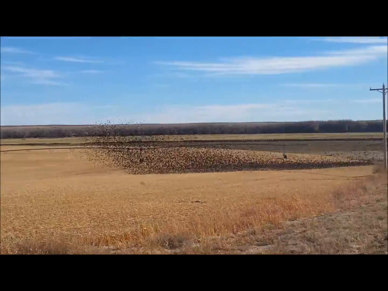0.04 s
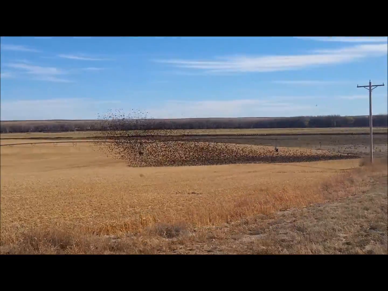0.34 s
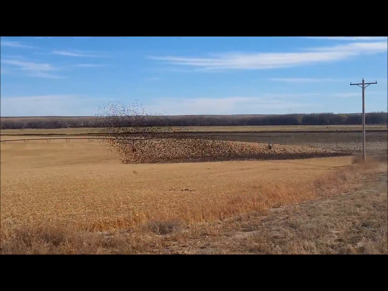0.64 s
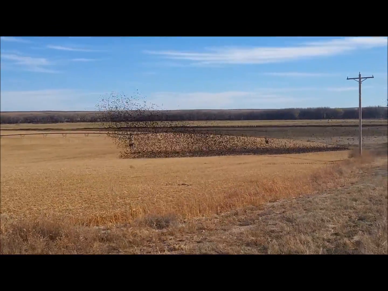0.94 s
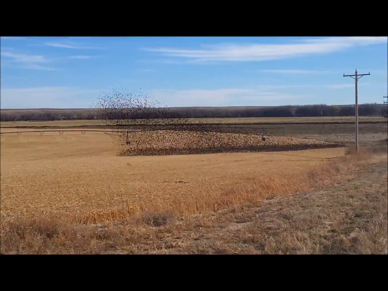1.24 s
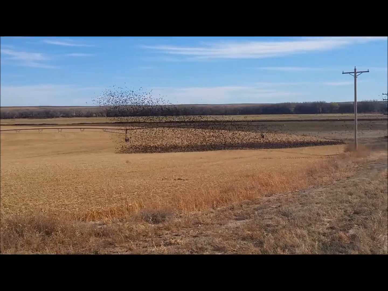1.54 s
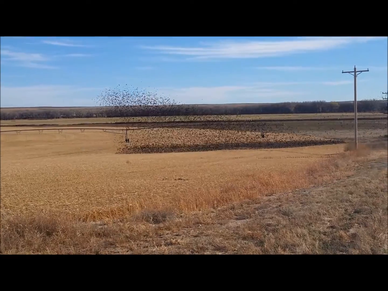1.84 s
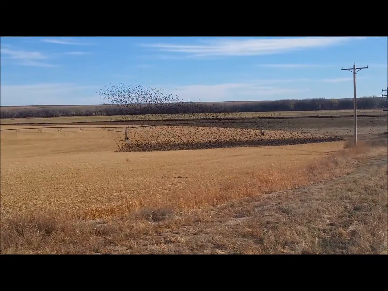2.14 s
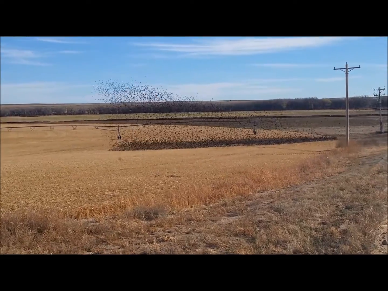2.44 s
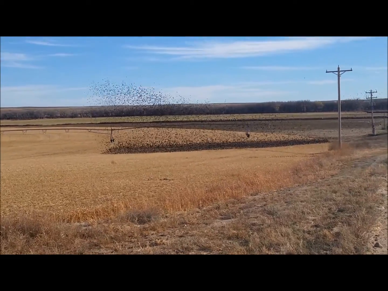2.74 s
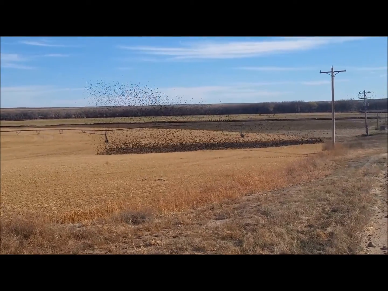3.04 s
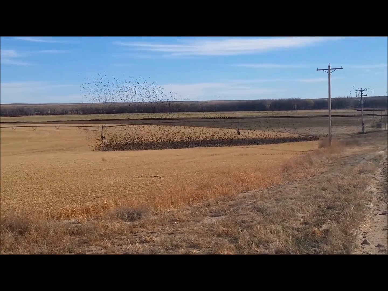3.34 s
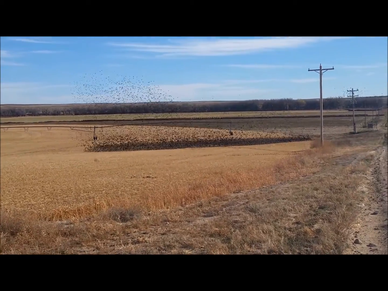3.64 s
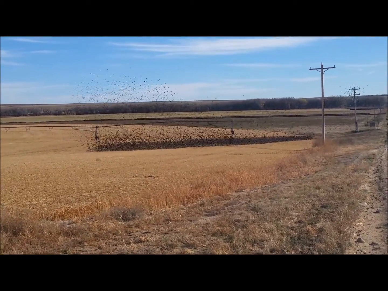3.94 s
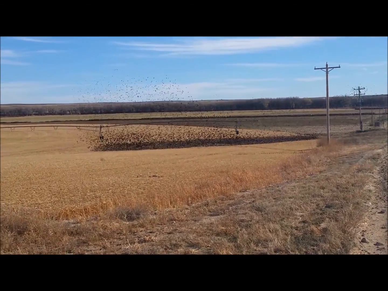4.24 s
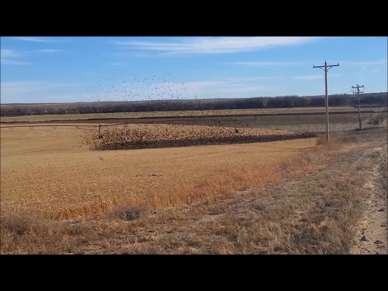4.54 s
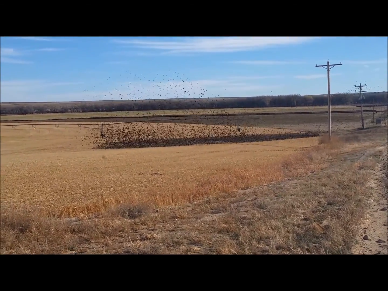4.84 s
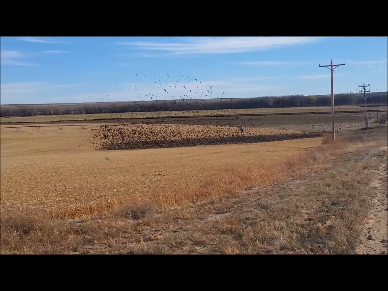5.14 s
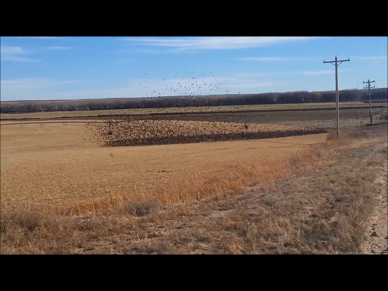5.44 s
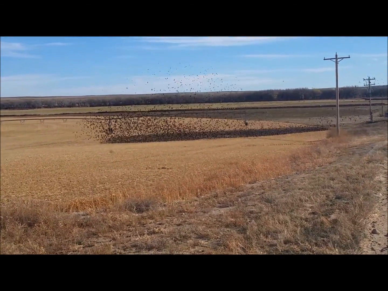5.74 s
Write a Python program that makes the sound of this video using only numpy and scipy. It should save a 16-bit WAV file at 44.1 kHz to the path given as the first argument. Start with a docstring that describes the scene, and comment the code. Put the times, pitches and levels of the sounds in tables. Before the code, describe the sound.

Wind blows across a hand-held microphone in an open field, making a low, fluttering rumble with thuds and crackles, far harder on the left than on the right. The gusts are longer at first, then turn short and choppy. Far behind, a flock of small birds chatters very faintly, with a few thin chirps. Dry grass swishes softly, and a thin, high rustle comes and goes close by.

```python
"""A gusty wind rumble with thuds and crackles, far harder on the left than on the right.
Wind over a stubble field sweeps eddies past the two ports of a hand-held microphone: the faster
the air, the louder and brighter the rumble. Single vortices slap the left port.
Far behind, a flock of small birds chatters and dry grass swishes over a faint, steady hush.
A thin, high rustle comes and goes close by."""
import sys
import numpy as np
from scipy import signal
from scipy.fft import rfft, irfft, next_fast_len
from scipy.io import wavfile
from scipy.ndimage import uniform_filter1d, minimum_filter1d, map_coordinates

SR = 44100
rng = np.random.default_rng(int(sys.argv[2]) if len(sys.argv) > 2 else 0)


def pcm_store(signal):
    """Save signal as 16-bit PCM."""
    levels = np.round(np.clip(np.atleast_2d(signal), -1, 1) * 32767)
    wavfile.write(sys.argv[1], SR, levels.astype(np.int16).T)


N = 264159
TIME = np.arange(N) / SR


# Each row: frequency in Hz at nominal air speed, relative level in dB.
LEFT_EDDY_SPECTRUM = [(20, 12), (60, 2), (110, -0.5), (180, -5.5), (280, -17.5), (450, -31.5), (700, -50),
                      (1100, -71.5), (1800, -92.5), (4000, -110)]

def left_wind(octaves_per_db=0.0823, flutter_octaves=0.1105, flutter_db=3.0, lump_db=1.4061):
    """Eddies rumble on the exposed port: brighter in strong gusts, duller as the wind slackens."""
    start_octaves, slackening_octaves_per_s = 0.07, 0.032
    level_db = gust_level_db() + lump_db * drift(rate_hz=14)
    flutter = drift(rate_hz=40.56)
    speed_octaves = start_octaves - slackening_octaves_per_s * TIME
    speed_octaves += octaves_per_db * (level_db - level_db.mean()) + flutter_octaves * flutter
    rumble = swept_eddies(LEFT_EDDY_SPECTRUM, speed_octaves) * from_db(flutter_db * flutter)
    return evened(rumble, span_s=0.047) * from_db(level_db)


# Each row: start in seconds, length before release in seconds, level in dB.
LEFT_GUSTS = [(-0.03, 0.51, -11.0), (0.526, 0.16, -11.5), (0.72, 0.25, -12.0), (1.026, 0.08, -16.5),
              (1.144, 0.24, -13), (1.382, 0.34, -10.5), (1.759, 0.176, -15.5), (1.947, 0.41, -14.0),
              (2.4, 0.34, -13.0), (2.77, 0.32, -16), (3.144, 0.05, -16.0), (3.219, 0.0712, -14),
              (3.303, 0.05874, -14.5), (3.438, 0.05, -20.5), (3.516, 0.04994, -14.5), (3.721, 0.04, -18),
              (3.895, 0.18, -14.5), (4.221, 0.23, -14), (4.508, 0.185, -14.5), (4.795, 0.18, -17),
              (5.117, 0.16, -17), (5.42, 0.14, -14.5), (5.641, 0.0799, -15.5), (5.763, 0.09, -10.5),
              (5.92, 0.08, -17.0)]

def gust_level_db(attack_s=0.02226, release_s=0.03, breeze_db=-22.5, breeze_db_per_s=0.155):
    """Each gust rises, holds and dies away, adding its power to the breeze."""
    power = from_db(breeze_db + breeze_db_per_s * TIME) ** 2
    for start_s, length_s, db in LEFT_GUSTS:
        attack = np.clip((TIME - start_s) / attack_s, 0, 1)
        release = np.exp(-np.maximum(TIME - start_s - length_s, 0) / release_s)
        power += (from_db(db) * attack * release) ** 2
    return 10 * np.log10(power)


def swept_eddies(spectrum, speed_octaves, vent_hz=55):
    """A frozen pattern of eddies passes the port, so its whole spectrum slides with air speed."""
    pattern = coloured(rng.standard_normal(2 * N), spectrum)
    travelled = np.cumsum(2 ** np.clip(speed_octaves, -2, 2))
    pressure = map_coordinates(pattern, [travelled], order=1, mode="wrap")
    # Slow pressure changes leak away through the capsule's vent.
    return signal.sosfilt(signal.butter(3, vent_hz, "high", fs=SR, output="sos"), pressure)


# Each row: centre in seconds, peak level in dB, core width in seconds.
LEFT_BUFFETS = [(0.08, -11.5, 0.00091), (0.148, -9, 0.0012), (0.197, -17, 0.00085), (0.259, -26, 0.00077),
                (0.365, -18.5, 0.00086), (0.42, -9, 0.0041), (0.457, -26, 0.001), (0.477, -5.5, 0.00099),
                (0.578, -20, 0.00068), (0.651, -16, 0.00097), (0.691, -11, 0.0011), (0.751, -9.5, 0.00095),
                (0.763, -10.5, 0.0012), (0.801, -13.5, 0.0011), (0.853, -13, 0.0014), (0.875, -15, 0.00095),
                (0.9, -11, 0.00099), (0.921, -26.5, 0.00061), (1.053, -22.5, 0.00096),
                (1.199, -13, 0.00076), (1.317, -20.5, 0.00083), (1.416, -1, 0.0026), (1.439, -13.5, 0.0012),
                (1.466, -18.5, 0.00072), (1.5, -7.5, 0.00091), (1.542, -9, 0.00099),
                (1.588, -17.5, 0.00075), (1.648, -15.5, 0.0008), (1.676, -26, 0.00082),
                (1.802, -14, 0.00093), (2.032, -8.5, 0.0013), (2.129, -23, 0.00084),
                (2.203, -16.5, 0.00087), (2.236, -6, 0.0013), (2.296, -9.5, 0.0012), (2.356, -12, 0.0013),
                (2.452, -5.5, 0.0027), (2.589, -18, 0.00098), (2.633, -9.5, 0.0013), (2.693, -7, 0.0011),
                (3.018, -24, 0.00088), (3.241, -17, 0.0011), (3.272, -7.5, 0.002), (3.33, -16, 0.0014),
                (3.351, -12.5, 0.00079), (3.544, -4.5, 0.0024), (3.563, -21.5, 0.001),
                (3.75, -11.5, 0.0022), (3.93, -16.5, 0.0012), (3.995, -22.5, 0.0012), (4.034, -16.5, 0.002),
                (4.278, -15, 0.0011), (4.359, -12, 0.0011), (4.439, -23, 0.00066), (4.547, -8, .0017),
                (4.635, -7.5, 0.0017), (4.647, -6.5, 0.00098), (4.66, -11, 0.0013), (4.685, -14, .0012),
                (4.839, -3.5, 0.0022), (4.877, -11.5, 0.0017), (4.984, -7, 0.0025), (5.151, -11, 0.0038),
                (5.186, -9.5, 0.0037), (5.226, -19.5, 0.00087), (5.442, -11, 0.0011), (5.566, -8.5, 0.0024),
                (5.814, -6, 0.0015), (5.84, -10.5, 0.00066)]

def buffets(flank_s=0.005, flank_db=-12):
    """Vortices slap the left port, each between two weaker ones. Small cores crack, wide ones thud."""
    out = np.zeros(N)
    for centre_s, peak_db, core_s in LEFT_BUFFETS:
        before, after, spin = rng.random(3)
        swing = vortex(core_s) * from_db(peak_db) * np.sign(spin - 0.5)
        for lag, db in ((0, 0), (-0.5 - before, flank_db), (0.5 + after, flank_db)):
            add_centred(out, centre_s + flank_s * lag, from_db(db) * swing)
    return out


def crackle(rate_hz=26, core_s=0.0008, gain_db=-7.0, growth=2.01, uneven_db=4.5, fade_db_per_s=1.0):
    """Small stray vortices grow faster than the rumble in a gust and fade as the wind slackens."""
    strays = (rng.random(N) < rate_hz / SR) * np.sign(rng.standard_normal(N))
    size_db = growth * gust_level_db() + gain_db - fade_db_per_s * TIME
    size_db += uneven_db * rng.uniform(-1, 1, N)
    return signal.fftconvolve(strays * from_db(size_db), vortex(core_s), "same")


def vortex(core_s):
    """A vortex crossing the port makes one two-sided pressure swing of height 1."""
    reach = int(0.02 * SR)
    distance = np.arange(-reach, reach + 1) / (core_s * SR)
    swing = distance / (1 + distance ** 2) ** 2
    return swing / swing.max()


# Each row: frequency in Hz at nominal air speed, relative level in dB.
RIGHT_EDDY_SPECTRUM = [(20, -3.5), (80, -0.5), (150, -3), (220, -9.5), (350, -26), (600, -41), (1000, -57),
                       (3000, -100)]
# Each row: time in seconds, level in dB.
RIGHT_WIND_LEVELS = [(0.0, -22.5), (0.24, -37), (0.36, -23), (0.76, -21), (0.9, -28), (1.04, -44),
                     (1.14, -28), (1.45, -34), (1.88, -29), (2.28, -30), (2.36, -41), (2.43, -26),
                     (2.67, -22.5), (3.01, -45.5), (3.26, -41), (3.36, -26), (3.73, -30), (4.1, -33),
                     (4.45, -28), (4.6, -32), (4.73, -23), (4.87, -45), (5.08, -36.5), (5.19, -22),
                     (5.3, -33), (5.55, -30), (5.72, -20), (5.99, -28.5)]

def right_wind(octaves_per_db=0.0272, flutter_octaves=0.15, flutter_db=2.5, lump_db=2.0):
    """Weaker, lumpy eddies pass the sheltered port, a little brighter as they grow louder."""
    level_db = in_time(RIGHT_WIND_LEVELS) + lump_db * drift(rate_hz=10)
    flutter = drift(rate_hz=35)
    speed_octaves = octaves_per_db * (level_db - level_db.mean()) + flutter_octaves * flutter
    rumble = swept_eddies(RIGHT_EDDY_SPECTRUM, speed_octaves) * from_db(flutter_db * flutter)
    return evened(rumble, span_s=0.6) * from_db(level_db)


# Each row: frequency in Hz, relative level in dB.
FLOCK_SPECTRUM = [(1000, -19), (1900, -3.5), (2350, 2.5), (2550, -4), (2850, -10), (3600, -12),
                  (6000, -37.5)]
# Each row: time in seconds, relative level in dB.
FLOCK_LEVELS = [(0.0, -73.5), (0.51, -68), (2.04, -78), (2.42, -68.5), (3.06, -68.5), (3.85, -66.5),
                (4.15, -68), (5.98, -67.5)]
# Many birds call at once. Each row: centre in seconds, rise in dB.
FLOCK_OUTCRIES = [(2.72, 3.5), (3.08, 5), (3.5, 5), (5.36, 4), (5.69, 5)]

def flock(count=380, pitch_hz=2400, spread_octaves=0.25, calls_db=-5.0, shared_db=-1.5, gain_db=0.9):
    """Far birds merge into a band of noise, partly shared by both ports; short calls flicker in it."""
    calls = np.zeros(N + SR)
    for start, (pitch, glide) in zip(rng.integers(0, N, count), rng.standard_normal((count, 2))):
        hz = pitch_hz * 2 ** (spread_octaves * pitch)
        note = chirp(hz, glide_octaves=0.08 * glide, length_s=0.03, hoarse_hz=80)
        calls[start:start + len(note)] += note * np.exp(-pitch ** 2 / 2)  # loudest at pitch_hz
    voices = rng.standard_normal((2, N)) + from_db(shared_db) * rng.standard_normal(N)
    chatter = coloured(voices, FLOCK_SPECTRUM) + from_db(calls_db) * unit_rms(calls[:N])
    outcry_db = sum(db * swell(centre_s, half_width_s=0.038) for centre_s, db in FLOCK_OUTCRIES)
    level_db = in_time(FLOCK_LEVELS) + outcry_db + drift(rate_hz=7.9) + gain_db
    return panned(chatter * from_db(level_db), left_db=2.5)


# Each row: centre in seconds, pitch in Hz, glide in octaves, length in seconds, level in dB.
NEAR_CALLS = [(0.533, 5625, 0, .095, -69), (0.542, 4990, 0, .095, -72), (.537, 3770, -0.069, .05, -67.5),
              (.566, 3890, -0.08, .065, -64), (2.845, 5170, .06, .054, -77), (2.888, 5920, .2, .067, -77),
              (5.086, 2840, 0.16, 0.036, -67), (5.39, 4600, .18, 0.12, -70.5), (5.303, 5080, .1, 0.08, -72),
              (5.56, 4660, 0.1, .035, -66), (5.657, 3120, -0.19, 0.034, -64)]

def near_birds(quaver_depth=0.63):
    """Thin, quavering notes from nearer birds stand out of the chatter."""
    out = np.zeros(N)
    for centre_s, hz, glide_octaves, length_s, db in NEAR_CALLS:
        add_centred(out, centre_s, from_db(db) * chirp(hz, glide_octaves, length_s, hoarse_hz=13))
    return out * (1 + quaver_depth * drift(rate_hz=90))


def chirp(hz, glide_octaves, length_s, hoarse_hz):
    """One soft-edged, gliding bird note; wandering phase widens its line by hoarse_hz."""
    progress = np.linspace(0, 1, int(length_s * SR))
    pitch_hz = hz * 2 ** (glide_octaves * (progress - 0.5))
    wander = np.sqrt(2 * np.pi * hoarse_hz / SR) * rng.standard_normal(SR // 4)[:len(progress)]
    phase = np.cumsum(2 * np.pi * pitch_hz / SR + wander)
    return np.sin(np.pi * progress) ** 2 * np.sin(phase)


# Each row: frequency in Hz, relative level in dB.
RUSTLE_SPECTRUM = [(3000, -44.5), (7500, -26), (9000, -36), (10200, -14), (11200, -4.5), (12100, 1.5),
                   (13200, -5), (14500, -13)]
# Each row: time in seconds, relative level in dB.
RUSTLE_LEVELS = [(0.0, -73.5), (0.12, -68), (0.18, -62), (0.26, -64.5), (0.33, -58), (0.44, -64),
                 (0.91, -69.5), (1.2, -67.5), (1.44, -75), (2.06, -78), (2.55, -71.5), (3.58, -75.5),
                 (3.82, -73.5), (4.28, -73), (4.54, -68), (4.99, -71.5), (5.98, -71)]
# Each row: start in seconds, relative peak level in dB.
RUSTLE_TICKS = [(0.186, -50), (0.282, -34.5), (0.304, -41), (0.322, -44), (0.3486, -41), (0.362, -42.5),
                (1.651, -60), (5.0405, -55)]

def rustle(grain_db=1.5, gain_db=2.9, tick_decay_s=0.0022, tick_gain_db=-7):
    """Fine, grainy hiss and a few dry ticks, coloured by the high resonance of the ports."""
    envelope = from_db(in_time(RUSTLE_LEVELS) + gain_db + grain_db * drift(rate_hz=150))
    for start_s, db in RUSTLE_TICKS:
        decay = (TIME >= start_s) * np.exp(-np.abs(TIME - start_s) / tick_decay_s)
        envelope += from_db(db + tick_gain_db) * decay
    return panned(envelope * stereo_noise(RUSTLE_SPECTRUM), left_db=-6)


# Each row: frequency in Hz, relative level in dB.
GRASS_SPECTRUM = [(1500, -10), (3000, 3.5), (5000, 0.5), (6000, -7.5), (6600, -21.5), (7400, -11.5),
                  (8500, -28.5), (12000, -30.5)]
# Each row: time in seconds, relative level in dB.
GRASS_LEVELS = [(0, -80), (0.5, -76.5), (1.1, -79.5), (1.7, -84), (2.22, -83.5), (2.3, -77.5), (3.4, -80),
                (4.9, -79), (5.6, -76), (5.99, -77.5)]
# Each row: centre in seconds, half-width in seconds, relative level in dB.
GRASS_SWISHES = [(0.58, 0.024, -72), (2.3, 0.031, -88.5), (3.002, 0.05, -80), (3.209, 0.028, -80),
                 (3.69, 0.048, -85.5), (4.208, 0.096, -84.5), (5.29, 0.062, -73.5)]

def grass(gain_db=7.5, uneven_db=2.4):
    """Dry stalks brush one another in a soft, uneven swish that swells now and then."""
    brushing = stereo_noise(GRASS_SPECTRUM)
    bed = from_db(in_time(GRASS_LEVELS) + uneven_db * drift(rate_hz=14))
    swishes = sum(from_db(db) * swell(centre_s, half_s) for centre_s, half_s, db in GRASS_SWISHES)
    return panned(brushing * (bed + swishes) * from_db(gain_db), left_db=-4.5)


# Each row: frequency in Hz, relative level in dB.
AIR_SPECTRUM = [(100, 4), (500, 2), (1000, 3), (1600, -0.5), (2500, -7.5), (4000, -27), (6000, -31),
                (9000, -38)]

def field_air(level_db=-62):
    """The faint, steady hush of the open field."""
    return panned(from_db(level_db) * stereo_noise(AIR_SPECTRUM), left_db=4)


def from_db(db):
    """Decibels to gain."""
    return 10 ** (np.asarray(db) / 20)


def unit_rms(x):
    """Scale to rms 1."""
    return x / np.sqrt(np.mean(x ** 2) + 1e-20)


def in_time(rows):
    """Interpolate (seconds, value) rows at every sample."""
    return np.interp(TIME, *np.transpose(rows))


def add_centred(out, centre_s, sound):
    """Mix a sound into out, centred on centre_s."""
    start = int(centre_s * SR) - len(sound) // 2
    out[start:start + len(sound)] += sound


def panned(x, left_db):
    """Set the left channel left_db above the right."""
    return x * from_db(np.array([[0.5], [-0.5]]) * left_db)


def coloured(x, spectrum):
    """Filter by (Hz, dB) rows; rms 1."""
    length = x.shape[-1]
    size = next_fast_len(length)
    hz, db = np.transpose(spectrum)
    bins_hz = np.maximum(np.fft.rfftfreq(size, 1 / SR), 1)
    response = from_db(np.interp(np.log(bins_hz), np.log(hz), db))
    return unit_rms(irfft(rfft(x, size) * response, size)[..., :length])


def stereo_noise(spectrum):
    """Independent coloured noise at each port; rms 1."""
    return coloured(rng.standard_normal((2, N)), spectrum)


def drift(rate_hz):
    """Random wander, mostly slower than rate_hz; rms 1."""
    size = next_fast_len(N)
    rolloff = 1 + (np.fft.rfftfreq(size, 1 / SR) / rate_hz) ** 2
    return unit_rms(irfft(rfft(rng.standard_normal(size)) / rolloff, size)[:N])


def smoothed(x, size):
    """Two passes of a moving average over size samples."""
    return uniform_filter1d(uniform_filter1d(x, size), size)


def evened(x, span_s):
    """Level out swells slower than span_s; rms about 1."""
    return x / np.sqrt(smoothed(x ** 2, int(span_s * SR)) + 1e-12)


def swell(centre_s, half_width_s):
    """A Gaussian rise and fall of height 1."""
    return np.exp(-((TIME - centre_s) / half_width_s) ** 2)


def scene():
    """Each port has its own wind; the field lies faintly behind."""
    wind = np.array([left_wind() + buffets() + crackle(), right_wind()])
    return wind + field_air() + flock() + near_birds() + grass() + rustle()


def record(dry, ceiling=0.95, limiter_s=0.012, cutoff_hz=14650):
    """A smooth limiter holds the hardest gusts under full scale; the top of the treble is cut."""
    size = int(limiter_s * SR)
    needed_gain = ceiling / np.maximum(np.abs(dry).max(axis=0), ceiling)
    gain = smoothed(minimum_filter1d(needed_gain, 2 * size), size)
    return signal.sosfilt(signal.ellip(10, 0.1, 80, cutoff_hz, fs=SR, output="sos"), dry * gain)


dry = scene()
out = record(dry)
pcm_store(out)
```